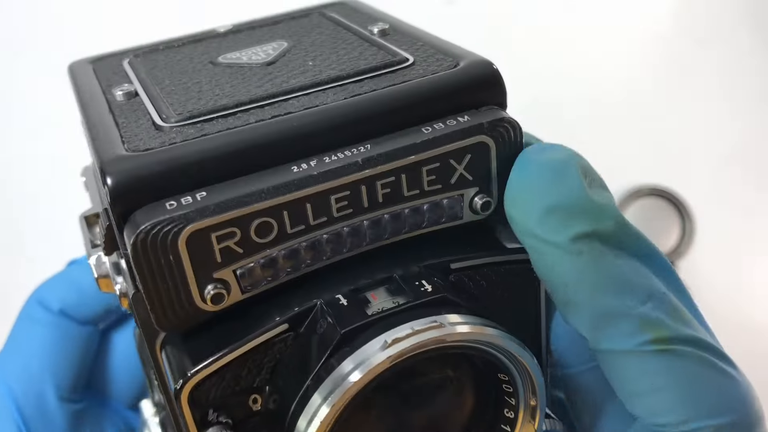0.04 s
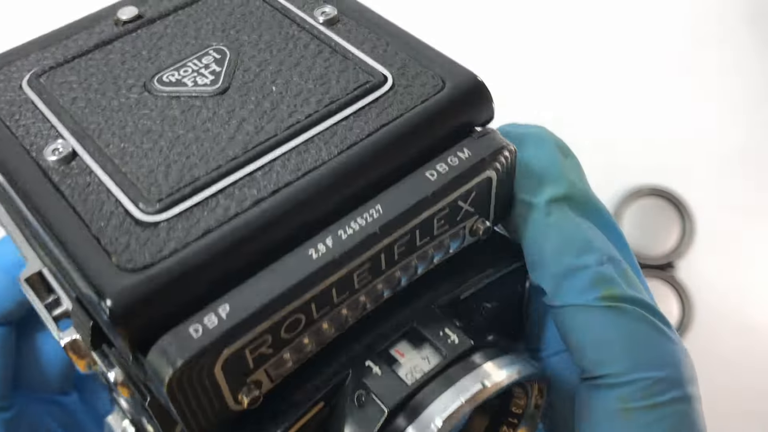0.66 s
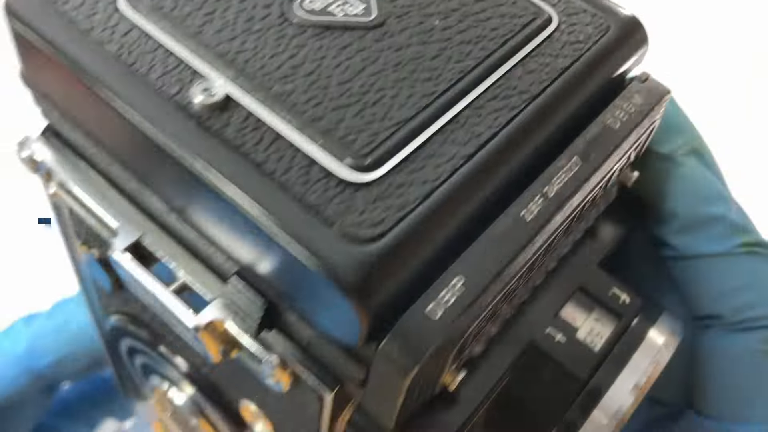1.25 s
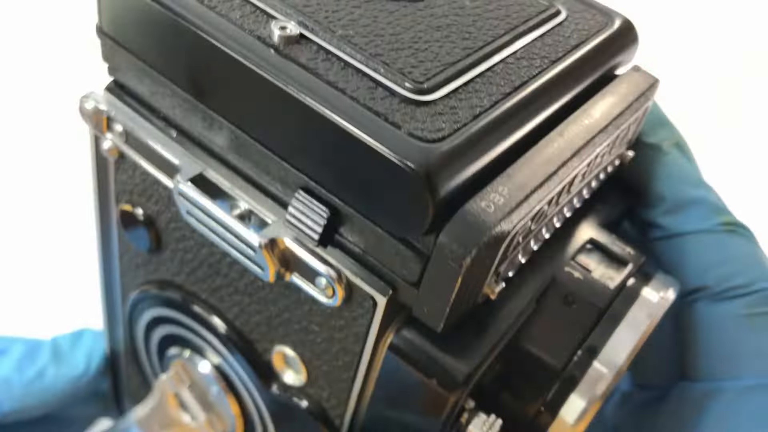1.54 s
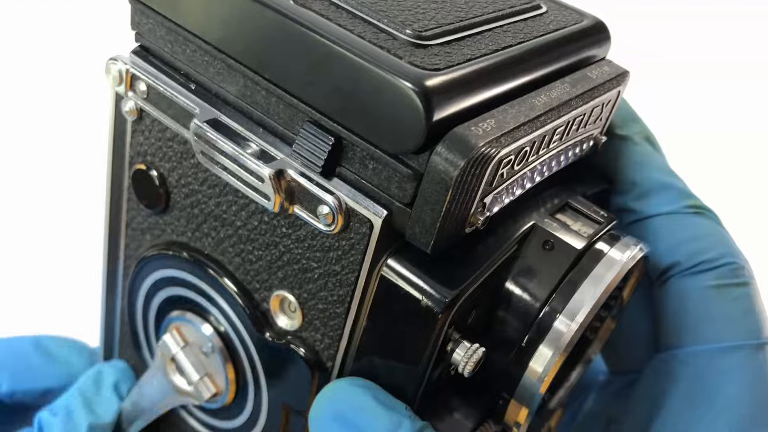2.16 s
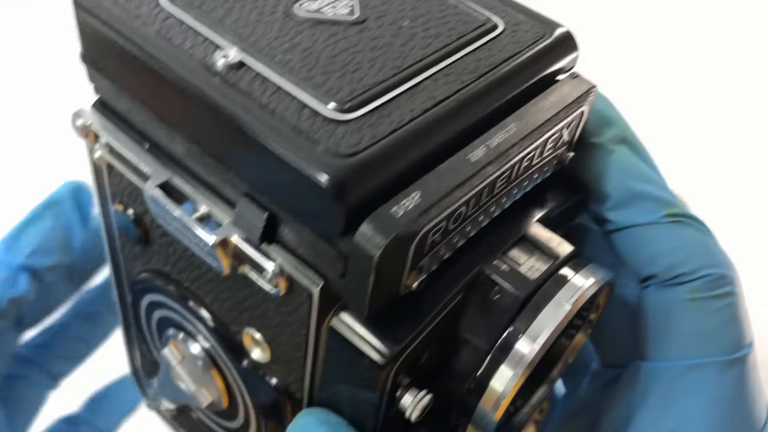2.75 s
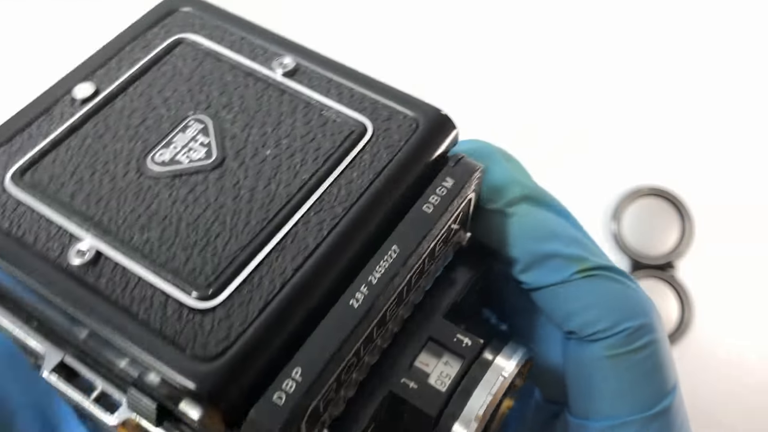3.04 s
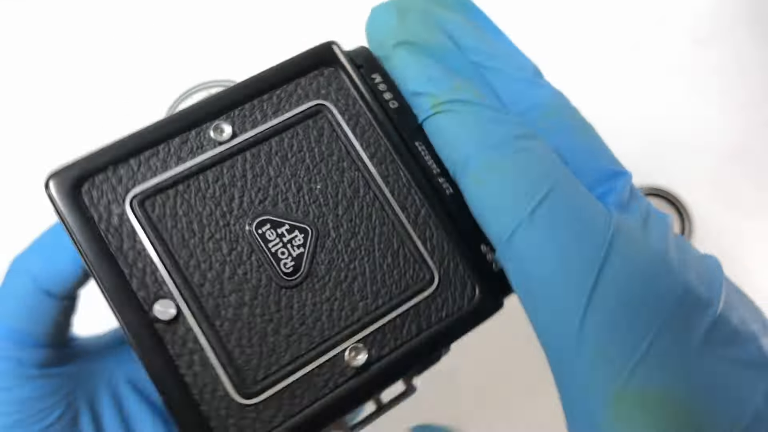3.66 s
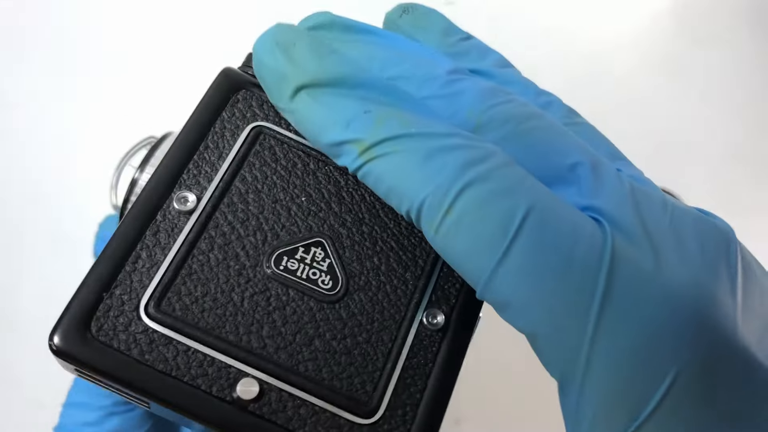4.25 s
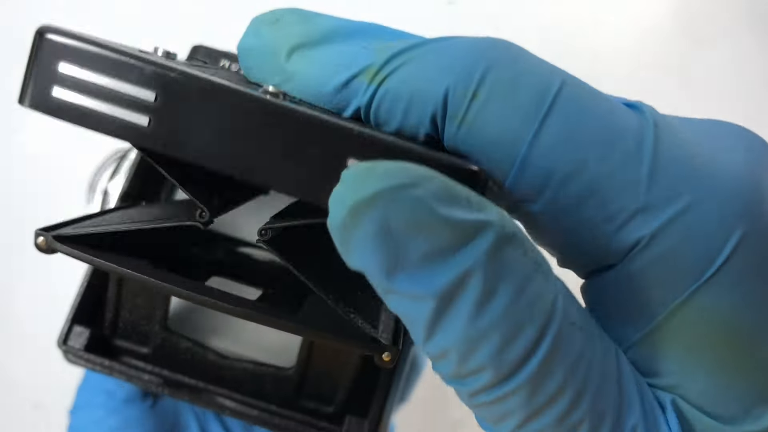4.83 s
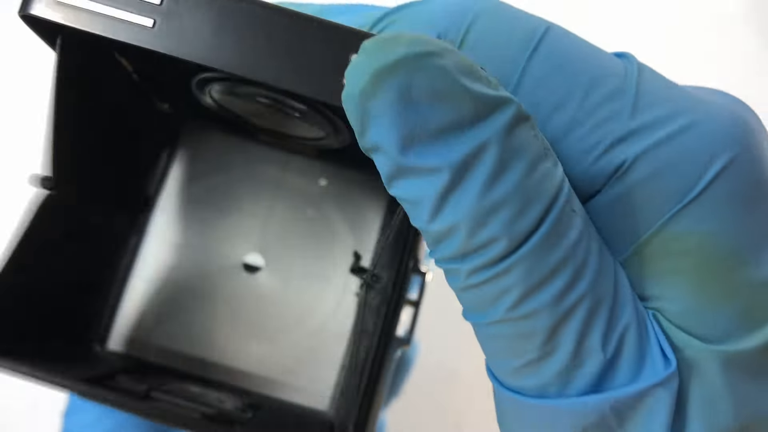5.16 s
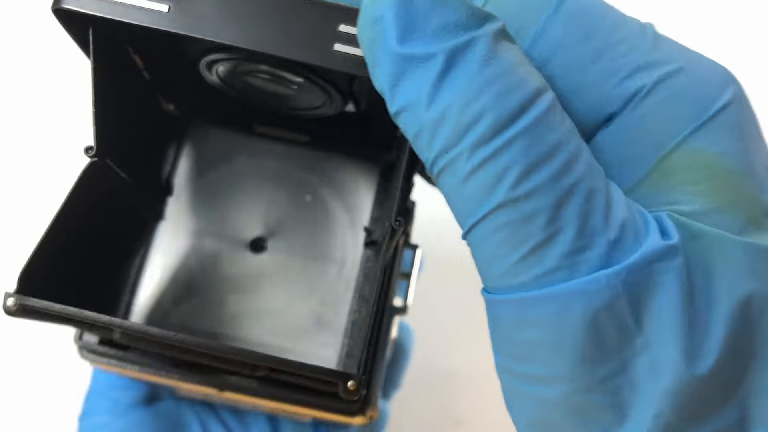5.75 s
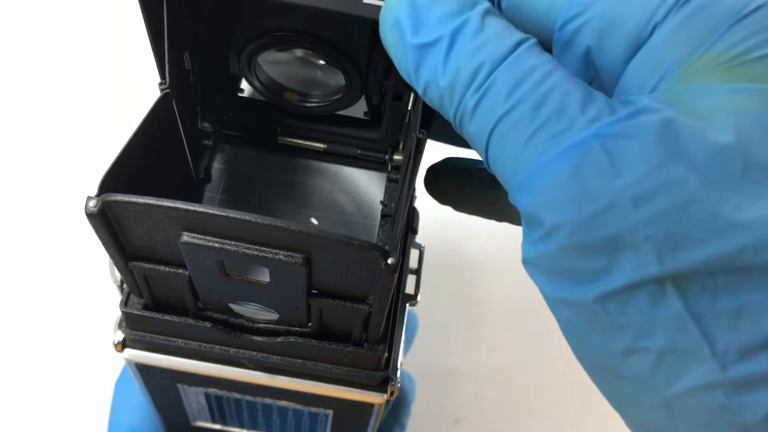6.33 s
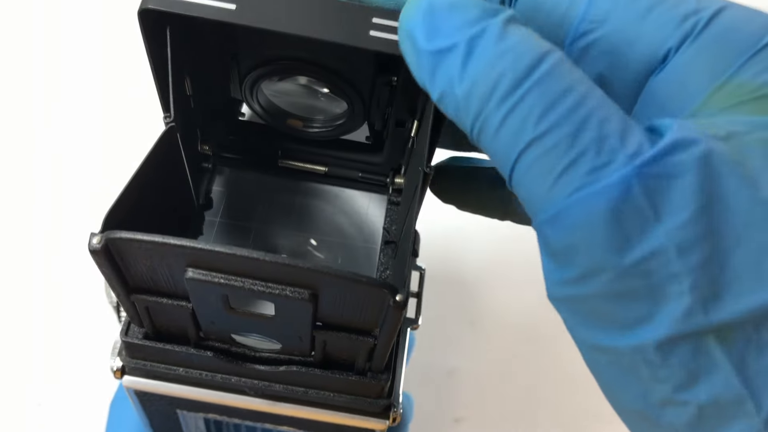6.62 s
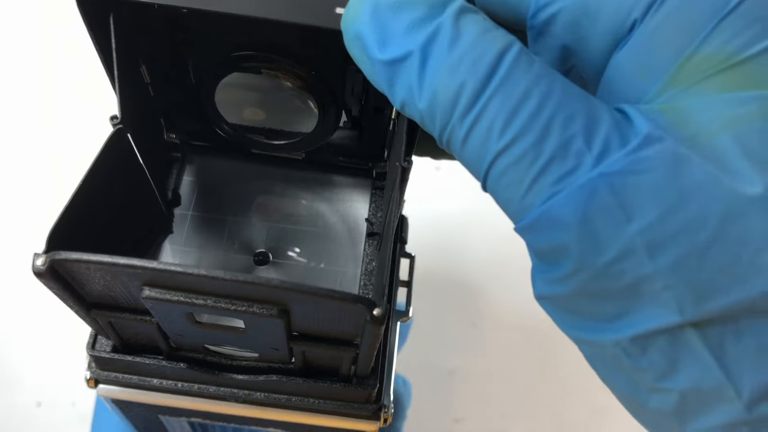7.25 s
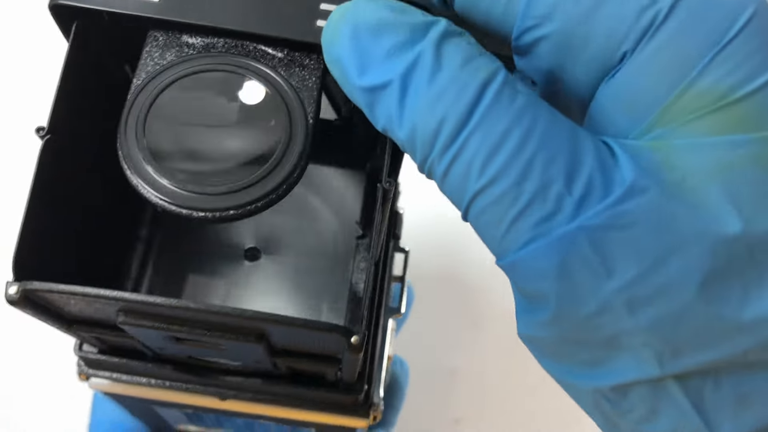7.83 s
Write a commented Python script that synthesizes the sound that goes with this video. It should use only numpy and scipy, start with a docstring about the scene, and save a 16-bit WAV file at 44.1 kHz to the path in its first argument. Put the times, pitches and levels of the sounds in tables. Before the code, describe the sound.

Rubber gloves softly rub a metal camera with small ticks, then its hood clicks open and a spring-loaded magnifier snaps up sharply.

```python
"""Rubber gloves rub softly on a metal twin-lens camera, close by, over the low rumble of a small quiet room.
As it is turned over, the crank and fittings tick, a fingertip sticks and slips in a squeak, and a hand
bumps the lid. The folding hood clicks open and latches, each knock ringing the metal. Last and loudest,
the spring-loaded magnifier in the hood scrapes up on its hinge and clatters against its stop."""
import sys
import numpy as np
from scipy import signal
from scipy.fft import rfft, irfft
from scipy.io import wavfile
from scipy.ndimage import uniform_filter1d

SR = 44100
rng = np.random.default_rng(int(sys.argv[2]) if len(sys.argv) > 2 else 0)


def unload_audio(sound):
    """Save the sound as a 16-bit wav file, at the path given as the first command line argument."""
    columns = np.transpose(np.atleast_2d(sound))
    # keep every value between -1 and 1, then stretch to whole-number steps
    steps = np.round(np.clip(columns, -1, 1) * 32767)
    wavfile.write(sys.argv[1], SR, steps.astype(np.int16))


N = 352369

# Ticks of the crank and fittings, then clicks of the hood's flaps and latch:
# (time [s], level [dB], extra treble [dB], note of the touched part [Hz])
CRANK_TICKS = [(.8077, -65.5, -5, 2750), (.9, -61, -1, 5800), (1.3456, -64.5, -28, 2800),
               (1.4142, -72, -27, 3940), (1.6822, -62.5, -12, 4100), (1.7103, -58.5, 2, 2180),
               (1.9188, -66.5, -19, 2490), (1.9919, -72, 13.5, 8200), (2.1306, -53, 7, 3780),
               (2.169, -57, 0, 4200), (2.339, -61, -11, 1950), (3.3289, -63.5, -8, 3820),
               (3.6322, -64, 1, 1920), (4.0239, -67, -11, 1880)]
HOOD_CLICKS = [(4.7835, -67.5, -16, 1530), (5.178, -61, -8, 3100), (5.196, -54, 0.5, 3200),
               (5.1999, -58, 2, 1310), (5.2451, -67, -8, 1250), (5.358, -50.5, -10, 1120),
               (5.364, -57, -6, 1130), (5.4432, -68.5, -28, 1070), (5.6668, -59.5, 5.5, 1260),
               (5.704, -42.3, 0, 3940), (5.726, -48.2, 0, 2900), (5.7546, -54.5, 4.5, 5300),
               (5.9191, -59.5, -9, 4300), (6.0708, -60, -9, 3540), (6.1476, -53, -3.5, 4470),
               (6.2214, -64, -3, 3150), (6.233, -58, -16, 3120), (6.3249, -67, -11, 1240),
               (6.365, -58, -16, 1230), (6.4132, -51, 4, 4000), (6.83, -56, 0.5, 3370),
               (6.9566, -62, -10, 4100), (7.1906, -62.5, -14, 4500), (7.3927, -71, -30, 3400),
               (7.4965, -74, -11, 4400), (7.784, -63, -12, 5330), (7.886, -69, -19, 1240)]
# Glove strokes: (middle time [s], length of the loud part [s], level [dB], extra treble [dB], note [Hz])
GLOVE_STROKES = [(0.15, 0.13, -75.5, -2, 3640), (.426, 0.069, -69.5, -1, 5030),
                 (.521, 0.041, -70, 9.5, 5400), (0.827, 0.09, -78, 4, 3000),
                 (1.032, 0.085, -77.5, 4.5, 2340), (1.491, .045, -72, -4, 4040),
                 (1.65, 0.072, -68.5, -3, 3870), (2.333, 0.17, -71, 3, 4000),
                 (2.338, 0.069, -63.5, 5.5, 5440), (2.578, .21, -84.5, 10.5, 4370),
                 (2.796, 0.2, -76.5, 4, 3030), (3.408, 0.051, -66, -2, 4360), (3.51, 0.1, -73, 4, 4700),
                 (3.721, 0.19, -64.5, -0.5, 1890), (3.958, .39, -73.5, -1.5, 1620),
                 (4.339, .13, -70.5, -5, 1660), (4.477, 0.089, -65, -4, 4300), (4.663, .15, -67, -1, 3150),
                 (5.932, 0.21, -74, 5, 4560), (6.395, 0.053, -63, -2, 6700), (7.85, 0.089, -69.5, -5, 3140)]
# Modes (ringing notes) of the crank side, hood and magnifier plate: (pitch [Hz], width [Hz], gain [dB])
CRANK_MODES = [(1923, 160, 7), (2740, 87, -11.5), (3660, 51, -1)]
HOOD_MODES = [(1060, 120, 2.1), (1220, 360, 9.4), (3130, 470, 0.5), (4130, 180, 3), (5230, 260, 4)]
PLATE_MODES = [(1000, 90, -6), (1220, 58, 6.5), (1450, 110, -0.5), (1620, 66, -1), (2137, 100, -4.5),
               (3516, 97, 3.5), (4300, 740, 4), (5760, 380, 6.5), (6740, 150, 6.5), (10000, 500, -4),
               (15500, 400, -2)]
# Tone colours of a light tap, a hard slam, rubbing and the room's air: (frequency [Hz], gain [dB])
TAP_COLOUR = [(100, 3), (350, 2), (2000, 0), (7500, -1), (13000, -5.5), (15800, -1.5)]
SLAM_COLOUR = [(400, -13), (540, -5.5), (750, -2.5), (1000, 2), (2100, 0), (2500, -9), (4500, -1),
               (8200, -8), (9300, -4), (12200, -7.5), (15800, -5.5)]
RUB_COLOUR = [(300, -0.5), (1200, 2), (1900, 0), (4300, 3.5), (10000, -1.5), (15800, -3.5)]
AIR_COLOUR = [(15, -40.5), (25, -15), (76, 4), (153, -4.5), (223, 0), (363, -5), (439, -4), (714, -11),
              (818, -8), (1230, -16.5), (1610, -18), (5280, -28.5), (14800, -36.5), (16000, -43)]
# Scrape of the hinge as the magnifier is let go and swings up: (time [s], level [dB])
HINGE_SWING = [(7.58, -79), (7.598, -63), (7.63, -63.5), (7.65, -44), (7.662, -53.5), (7.675, -30)]
# The magnifier strikes its frame on the way up: (time [s], level [dB])
FRAME_STRIKES = [(7.676, -36), (7.6805, -22.5), (7.6853, -26.5)]

LOW_HZ, MID_HZ, TREBLE_HZ = 2400, 8000, 15950  # where the low, middle and treble ranges end
LEAD_S, ATTACK_S = .005, .006  # a blow's run-up, and the span after it that sets its level
HOOD_OPEN_S = 4.8  # from here on the flaps are free to ring
NOTE_PER_DB = 0.9  # a cushioned touch has less treble, so the part's own note stands out more
# A firm knock dies away in CHATTER_S; a harder one settles sooner and leans toward the middle range.
FIRM_DB, CHATTER_S, HALF_CHATTER_DB, LEAN_PER_DB = -54.5, 0.045, 31, 0.1845
# The magnifier bounces on its stop; each gap is a fixed share of the one before.
STOP_S, STOP_DB, FIRST_GAP_S, GAP_SHARE = 7.693, -28.5, .016, .53
# Tone of a frame strike, tone of the stop, loss per bounce: (low [dB], middle [dB], treble [dB])
STRIKE_TONE, STOP_TONE, BOUNCE_LOSS = (-10, 0, 0.5), (5.5, 0, 9.8), (3.8, 6, 6.5)


def undb(db):
    """Turn decibels into a gain."""
    return 10 ** (np.asarray(db) / 20)


def unit(x):
    """Scale a sound to a typical size (rms) of 1."""
    return x / np.std(x)


def burst(t60, size=8192):
    """Noise that fades by 60 dB in t60 seconds."""
    return rng.standard_normal(size) * np.exp(-np.log(1000) * np.arange(size) / SR / t60)


def grainy_noise(size, grain_db):
    """Noise whose level jumps at every sample, like many tiny slips."""
    return rng.standard_normal(size) * undb(grain_db * rng.standard_normal(size))


def wander(t, hz, count=512):
    """Random values joined by straight lines, hz of them a second."""
    return np.interp(t * hz, np.arange(count), rng.standard_normal(count))


def add(out, start_s, x):
    """Mix x into out from start_s on."""
    i = max(int(start_s * SR), 0)
    out[i:i + len(x)] += x[:max(len(out) - i, 0)]


def butter(x, hz, kind, order=2):
    """Keep the lows, the highs or one band of a sound."""
    return signal.sosfilt(signal.butter(order, hz, kind, fs=SR, output="sos"), x)


def ring(x, modes):
    """The ringing of a part that is shaken by x."""
    return sum(undb(db) * signal.lfilter(*signal.iirpeak(hz, hz / width, fs=SR), x)
               for hz, width, db in modes)


def colour(x, points, size=1024):
    """Shape a sound's tone along a curve of (frequency [Hz], gain [dB]) points."""
    hz, db = np.transpose(points)
    freqs = np.maximum(np.arange(size // 2 + 1) * SR / size, 1)
    gain = undb(np.interp(np.log(freqs), np.log(hz), db))
    # this folding keeps the filter from sounding before its input does
    cepstrum = irfft(np.log(gain))
    cepstrum[1:size // 2] *= 2
    cepstrum[size // 2 + 1:] = 0
    return signal.fftconvolve(x, irfft(np.exp(rfft(cepstrum))))[:len(x)]


def range_levels(level_db, lean_db, treble_db):
    """Low, middle and treble levels; leaning trades lows for middle."""
    return level_db - lean_db, level_db + lean_db, level_db + treble_db


def balance(x, levels_db, start_s, end_s):
    """Scale the three ranges so they have the given levels between two times."""
    bands = (butter(x, LOW_HZ, "low", order=5),
             butter(x, [LOW_HZ, MID_HZ], "band", order=4),
             butter(x, MID_HZ, "high", order=5))
    span = slice(int(start_s * SR), int(end_s * SR))
    return sum(undb(db) * band / np.std(band[span]) for db, band in zip(levels_db, bands))


def air(level_db=-66.5):
    """Steady low rumble of the room with a faint hiss."""
    return undb(level_db) * unit(colour(rng.standard_normal(N), AIR_COLOUR, size=8192))


def room(x, t60=0.15, echo_db=-17, damp_hz=5000, delay_s=.003):
    """The table and near walls add a short, duller echo."""
    tail = butter(burst(t60, size=16384), damp_hz, "low", order=1)
    tail = np.pad(tail, (int(delay_s * SR), 0))
    return x + undb(echo_db) * signal.fftconvolve(x, tail / np.sqrt(np.sum(tail ** 2)))[:N]


def grip(level_db=-78, settle_db=-4, swell_db=5.0, swell_hz=12):
    """The holding hand creeps faintly, and settles once the hood is open."""
    t = np.arange(N) / SR
    slips = butter(grainy_noise(N, grain_db=7), 1700, "high")
    creep = unit(colour(slips, RUB_COLOUR))
    return creep * undb(level_db + swell_db * wander(t, swell_hz) + settle_db * (t > HOOD_OPEN_S))


def rubbing(spurt_db=4, spurt_hz=260, note_db=6, width_hz=600, shell_db=-6,
            even_hz=1750, lean_db_per_octave=2.5):
    """A glove slips in uneven spurts that ring the touched part and the shell; small parts are brighter."""
    out = np.zeros(N)
    for middle_s, length_s, level_db, treble_db, part_hz in GLOVE_STROKES:
        levels_db = range_levels(level_db, lean_db_per_octave * np.log2(part_hz / even_hz), treble_db)
        n = int(2.2 * length_s * SR)  # leaves time to fade in and out
        slips = grainy_noise(n, grain_db=5.0) * undb(spurt_db * wander(np.arange(n) / SR, spurt_hz))
        note = ring(slips, [(part_hz, width_hz, note_db - NOTE_PER_DB * treble_db)])
        shell = undb(shell_db) * ring(slips, CRANK_MODES if middle_s < HOOD_OPEN_S else HOOD_MODES)
        stroke = balance(colour(slips + note + shell, RUB_COLOUR), levels_db, 0, n / SR)
        swell = np.sin(np.pi * np.arange(n) / n) ** 3.05
        add(out, middle_s - n / SR / 2, stroke * swell)
    return out


def palm(start_s=3.632, gain_db=-35):
    """The hand lands on the lid with a soft, dull bump."""
    out = np.zeros(N)
    add(out, start_s, undb(gain_db) * butter(burst(t60=0.15), [300, 460], "band"))
    return out


def squeak(start_s=2.524, length_s=0.042, level_db=-57.5, slip_hz=390, jitter=0.023, count=24):
    """A fingertip sticks and slips as it leaves the crank, in quick pulses that swell, ease and stop."""
    times = np.cumsum(1 + jitter * rng.standard_normal(count)) / slip_hz
    times = times[times < length_s]
    pulses = np.zeros(N)
    pulses[((start_s + times) * SR).astype(int)] = np.sin(2.9 * times / length_s) ** 0.55
    # every slip shakes the rubber in the same brief way
    slips = signal.fftconvolve(pulses, burst(t60=0.0099, size=1024))[:N]
    modes = [(3270, 1700, -3), (4400, 1100, 2), (6300, 1100, -12)]
    sound = ring(butter(slips, [2300, 8500], "band"), modes)
    return undb(level_db) * sound / np.sqrt(np.sum(sound ** 2) / (length_s * SR))


def blow(levels_db, t60, tone_colour, modes, rise_s, spike_db, spike_s=.0012, size=8192):
    """Metal meets metal: a quick, slightly softened onset, then a fading crack that rings the part."""
    t = np.arange(size) / SR - LEAD_S
    # the first millisecond of hard contact stands above the fading chatter
    spike = 1 + undb(spike_db) * np.exp(-(t / spike_s - .5) ** 2)
    rise_and_fall = np.exp(np.minimum(t / rise_s, -np.log(1000) * t / t60))
    spectrum = rfft(rng.standard_normal(size) * spike * rise_and_fall)
    # so short a contact feeds all frequencies about equally
    spectrum /= np.sqrt(uniform_filter1d(np.abs(spectrum) ** 2, size=96))
    crack = colour(irfft(spectrum) * np.linspace(1, 0, size) ** 2, tone_colour)
    return balance(crack + ring(crack, modes), levels_db, LEAD_S, LEAD_S + ATTACK_S)


def knocks(table, modes, note_db, note_width_hz, rise_s, even_hz, lean_db_per_octave,
           scatter_db=4.5, minor_db=3, minor_width_hz=110):
    """Small parts knock on the hand-muffled shell; each adds a short note and minor modes of its own."""
    out = np.zeros(N)
    for time_s, level_db, treble_db, part_hz in table:
        # small, high-pitched parts and hard blows put less into the low range
        force_db = level_db - FIRM_DB
        lean_db = lean_db_per_octave * np.log2(part_hz / even_hz) + LEAN_PER_DB * force_db
        levels_db = range_levels(level_db, lean_db, treble_db)
        slowness = .5 ** (force_db / HALF_CHATTER_DB)
        # where the blow lands decides how strongly each shell mode answers
        shell = [(hz, width, db + scatter_db * rng.standard_normal()) for hz, width, db in modes]
        minor = [(hz, minor_width_hz, minor_db) for hz in rng.uniform(1420, 11790, size=10)]
        note = (part_hz, note_width_hz, note_db - NOTE_PER_DB * treble_db)
        knock = blow(levels_db, CHATTER_S * slowness, TAP_COLOUR, [*shell, *minor, note],
                     rise_s * slowness, spike_db=1)
        add(out, time_s - LEAD_S, knock)
    return out


def hinge(gain_db=-1):
    """The magnifier's hinge scrapes and rings the plate as it swings up."""
    times, db = np.transpose(HINGE_SWING)
    slips = colour(grainy_noise(N, grain_db=3), SLAM_COLOUR)
    level_db = np.interp(np.arange(N) / SR, times, db, left=-np.inf, right=-np.inf)
    return unit(slips + ring(slips, PLATE_MODES)) * undb(level_db + gain_db)


def magnifier(strike_t60=0.027, stop_t60=0.024, thud_db=3.5, stop_hits=4):
    """The sprung plate strikes its frame, then bounces on its stop ever sooner, softer and duller."""
    out = np.zeros(N)
    blows = [(time_s, db + np.array(STRIKE_TONE), strike_t60) for time_s, db in FRAME_STRIKES]
    for bounce in range(stop_hits):
        time_s = STOP_S + FIRST_GAP_S * np.sum(GAP_SHARE ** np.arange(bounce))
        levels_db = STOP_DB + np.array(STOP_TONE) - bounce * np.array(BOUNCE_LOSS)
        blows.append((time_s, levels_db, stop_t60))
    for time_s, levels_db, t60 in blows:
        slam = blow(levels_db, t60, SLAM_COLOUR, PLATE_MODES, rise_s=0.00034, spike_db=-3)
        add(out, time_s - LEAD_S, slam)
        # each blow also jolts the heavy camera body
        thud = butter(burst(t60=0.082), [85, 270], "band", order=3)
        add(out, time_s, undb(levels_db[0] + thud_db) * thud)
    return out


def scene():
    """All the handling sounds echo in the room, over its steady air."""
    crank = knocks(CRANK_TICKS, CRANK_MODES, note_db=1, note_width_hz=620, rise_s=0.00031,
                   even_hz=2150, lean_db_per_octave=5.0)
    hood = knocks(HOOD_CLICKS, HOOD_MODES, note_db=6, note_width_hz=220, rise_s=0.0007,
                  even_hz=2650, lean_db_per_octave=3.5)
    background = air()
    handling = crank + hood + magnifier() + hinge() + grip() + rubbing() + squeak() + palm()
    return (background + room(handling))[None]


def record(dry):
    """Cut the deepest bass and the highest treble."""
    treble_cut = signal.ellip(10, .2, 70, TREBLE_HZ, fs=SR, output="sos")
    return signal.sosfilt(treble_cut, butter(dry, 29, "high", order=3))


dry = scene()
out = record(dry)
unload_audio(out)
```